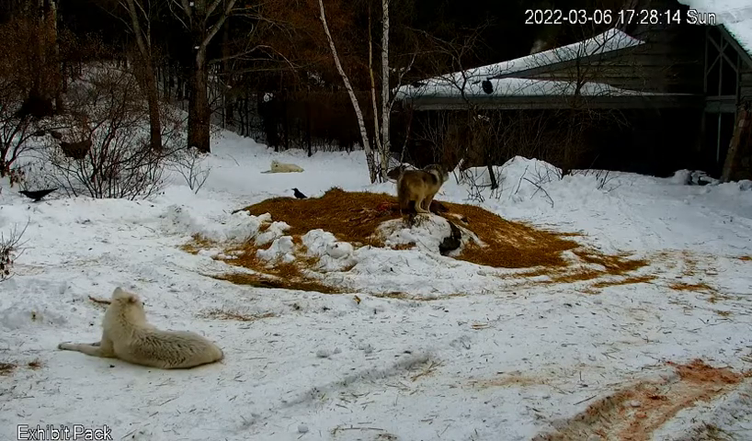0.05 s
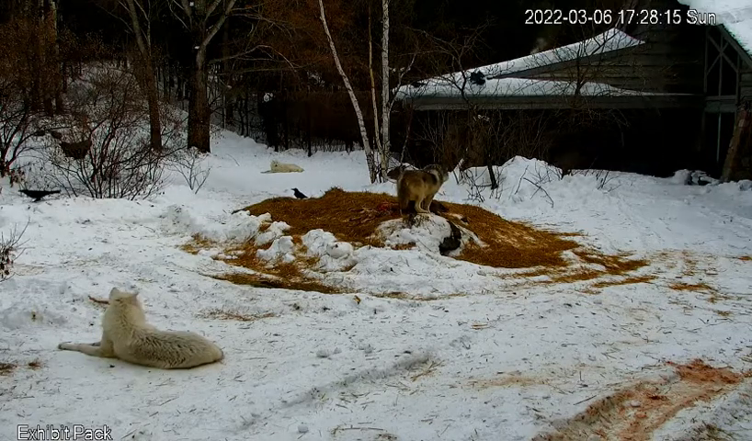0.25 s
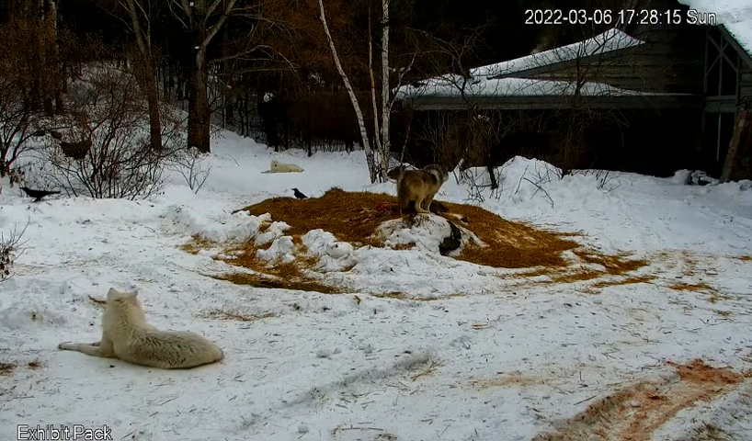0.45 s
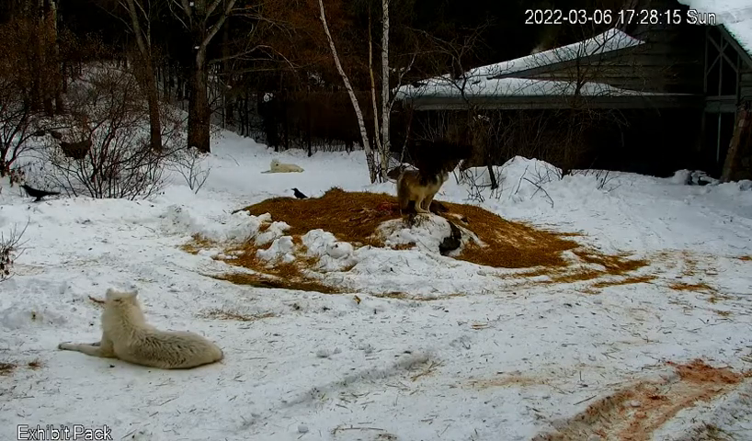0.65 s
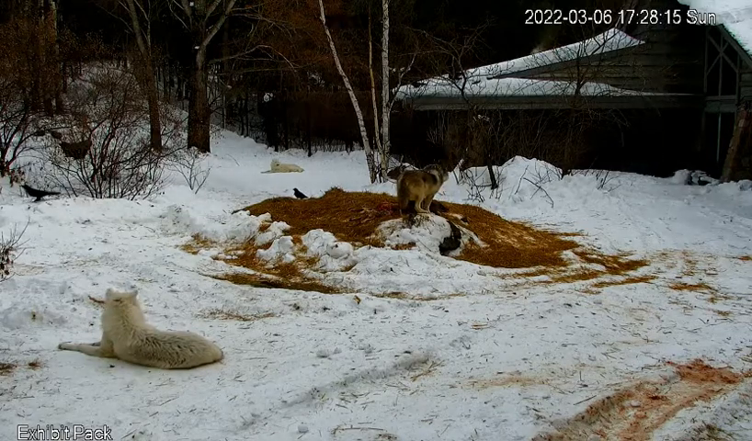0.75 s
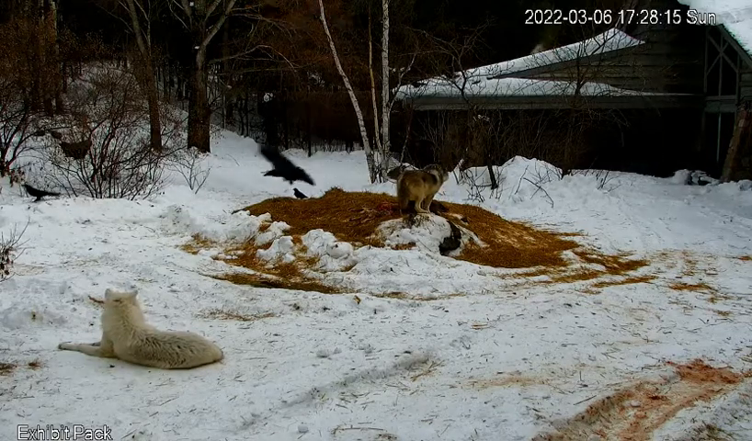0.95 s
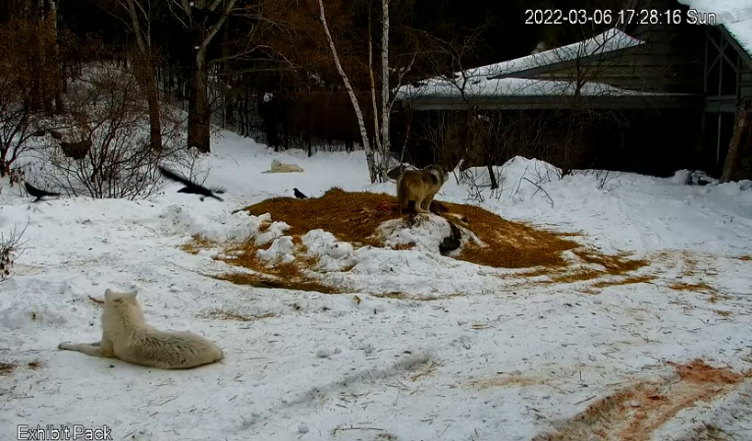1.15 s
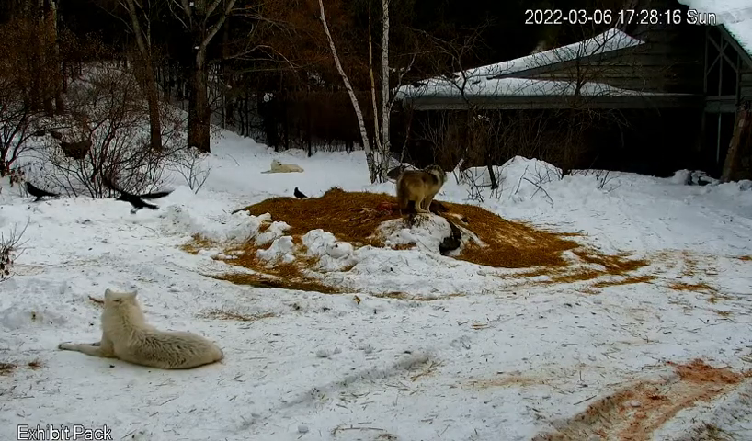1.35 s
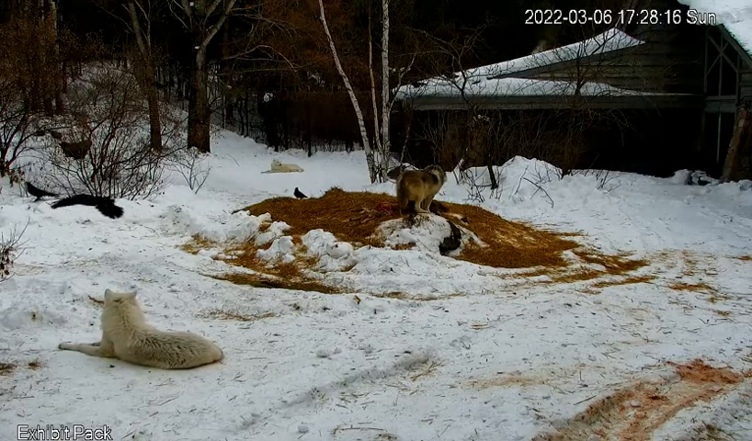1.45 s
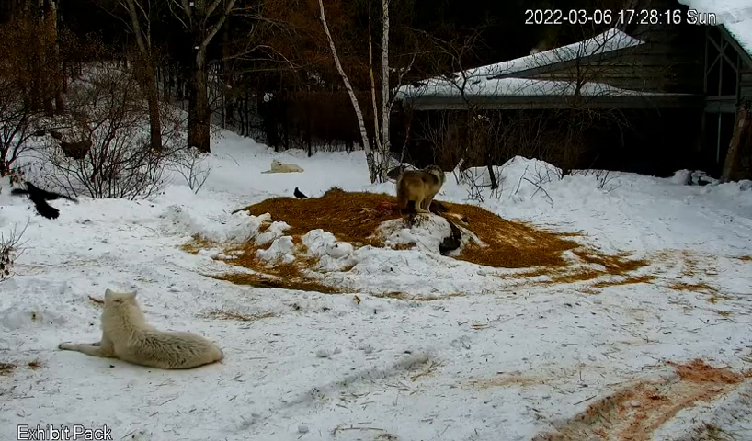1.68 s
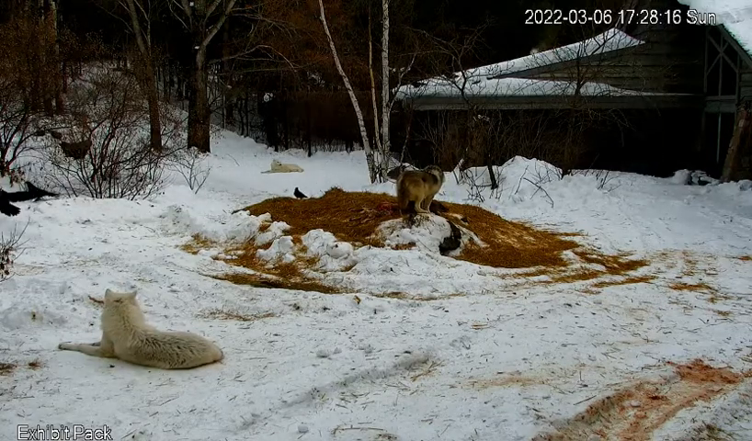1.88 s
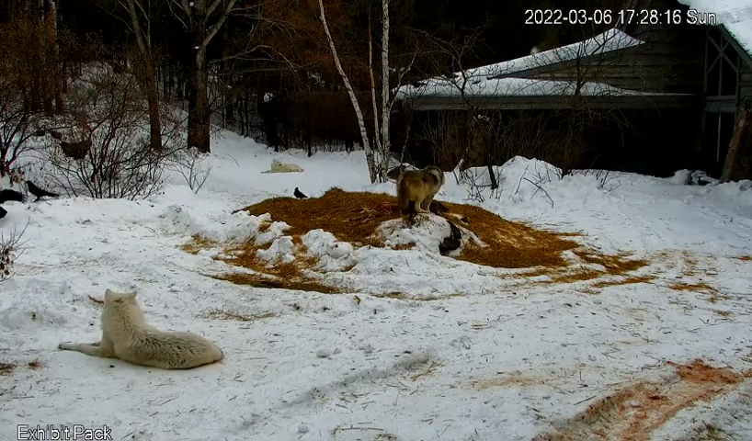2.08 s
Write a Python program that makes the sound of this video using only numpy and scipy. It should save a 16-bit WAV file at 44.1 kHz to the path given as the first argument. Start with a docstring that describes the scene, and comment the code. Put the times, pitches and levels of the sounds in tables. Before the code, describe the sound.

A raven calls twice in the first second, short, arched and raspy, each with a quick echo off trees and a shed; then soft hollow wing flaps and faint low thuds over quiet outdoor hiss.

```python
"""Raven calls in a snowy yard

Two ravens, probably, call once each: clear arched notes of eight harmonics with a breathy rasp. Trees and a
shed wall answer with smeared echoes and decaying noise tails. Soft hollow flaps, probably wings, are air noise
in two resonances; low thuds and two higher ticks are short sine bumps. Beneath lie a faint outdoor murmur and
a wavering hum, with a faint hiss above."""
import sys
import numpy as np
from scipy import signal
from scipy.fft import rfft, irfft, next_fast_len
from scipy.io import wavfile
from scipy.ndimage import uniform_filter1d, map_coordinates

SR = 44100
rng = np.random.default_rng(int(sys.argv[2]) if len(sys.argv) > 2 else 0)


def unload_wav(signal):
    """Save mono or channel-first audio to the path in sys.argv[1] as 16-bit WAV at rate SR, clipped to [-1, 1]."""
    wavfile.write(
        sys.argv[1],
        SR,
        np.round(np.clip(np.atleast_2d(signal).T, -1, 1) * 32767).astype(np.int16),
    )


N = 92610
T = np.arange(N) / SR  # time in seconds

# Outdoor murmur spectrum. Each row: frequency in Hz, relative density in dB.
MURMUR_SPECTRUM = [(15, -42), (25, -10.5), (76, -10.5), (145, -0.5), (210, -7), (243, -1.5), (318, -8),
                   (471, 2), (512, -3.5), (876, -1), (3500, -26.5), (4550, -74.5), (7700, -120)]
MURMUR_DB, MURMUR_LUMPS_DB = -55, 1.3
HUM_HZ, HUM_DB = 116.7, -69.5  # the hum level is that of the sine's peak
# Hiss spectrum. Each row: frequency in Hz, relative density in dB.
HISS_SPECTRUM = [(1760, -38), (3000, -8), (4040, -1.5), (6570, -2.5), (7190, -2), (15800, -4.5)]
# Level course of the hiss. Each row: time in seconds, level in dB before the common lift.
HISS_COURSE = [(0.0, -73.5), (0.22, -71.5), (0.43, -65), (0.44, -71.5), (0.79, -72), (1.06, -69),
               (1.09, -72), (1.74, -70), (2.1, -69.5)]
HISS_LIFT_DB = 3.44

# Course of each call. Each row: time in seconds, pitch in Hz, level of the second partial in dB,
# level in dB of the rasp's noise before the pitch pulses it.
CALL_1 = [(.208, 580, -71.5, -66.5), (.222, 697.6, -34, -54), (.232, 755.6, -24.5, -40),
          (.248, 795.2, -24, -43), (.276, 849.6, -19.5, -44.5), (.31, 859.1, -20, -42),
          (.342, 840.8, -19, -41), (.36, 814.8, -21, -42.5), (.38, 739, -30.5, -41),
          (.398, 615, -43.5, -56.5)]
CALL_2 = [(.848, 610.6, -67, -68), (.862, 694, -28, -51.5), (.878, 750.6, -23.5, -36),
          (.9, 774.5, -23.5, -45.5), (.94, 770.2, -25, -44), (.955, 745.6, -24, -43),
          (.968, 738.4, -22.5, -41.5), (.985, 656.4, -39, -46), (1.004, 537, -39, -69)]
# Throat colour of each call, taken relative to the second partial. Each row: frequency in Hz, gain in dB.
THROAT_1 = [(550, -8), (800, -15), (1250, 5), (1650, 5), (2100, -12), (2550, -15), (3300, -16.5),
            (4250, -29), (4700, -44.5), (5200, -46.5), (6000, -58.5), (7000, -63)]
THROAT_2 = [(550, -11.5), (760, -11), (1250, 0), (1550, 1.5), (2250, -21.5), (2800, -14.5), (3100, -19),
            (3800, -35), (4250, -33), (4650, -59), (5400, -75), (6200, -71)]
# Rasp spectrum. Each row: frequency in Hz, relative density in dB.
RASP_SPECTRUM = [(300, -36), (700, -10), (1500, 16.5), (2500, -0.5), (4000, -11), (5500, -36.5),
                 (7000, -34.5), (9000, -46)]
CALL_FADE_S = .006
PITCH_JITTER, JITTER_RATE = .0015, 300  # fraction of the pitch; knots per second
STEADY_DB = .5  # waver of the second partial
WAVER_DB, WAVER_RATE = 2.5, 120  # extra dB per root of the distance from the second; knots per second
# Below full voice each partial above the second loses this share of the drop again.
DULLING, FULL_VOICE_DB = .12, -22.5

# Walls and trunks heard from each calling place. Each row: delay in seconds, level in dB, treble lift in dB.
ECHOES_1 = [(0.029, -19.5, 1), (0.057, -11, 8), (.078, -9.5, 17.5), (.098, -13, 14.5), (.125, -18, 1.5),
            (0.149, -23, 5), (.165, -26, 3.5), (0.177, -21, -3), (.192, -26.5, -5), (.25, -42.5, 5),
            (0.369, -42.5, 4)]
ECHOES_2 = [(0.032, -13, 0.96), (0.059, -13, 1.5), (0.079, -11, 1.53), (0.099, -14.5, 1.4),
            (.118, -20.5, 1.5), (.15, -22, 1.3), (.178, -26, 1.5), (.19, -21.5, 1.5), (.205, -44, 1.47),
            (.25, -48, 1.5), (0.369, -40.5, 1.5)]
# Colour of the yard's answer to each call. Each row: frequency in Hz, gain in dB.
ANSWER_1 = [(500, -4), (850, 1.5), (1600, -3.5), (3000, -6.5), (4300, 0.5), (5200, 2.5), (7000, -5)]
ANSWER_2 = [(500, -9), (800, -9.5), (1600, -1.5), (3000, -7.5), (3900, 1), (5200, -14.5), (7000, -10)]
# Decay of the trees' answer. Each row: frequency in Hz, time to fall 60 dB in seconds.
TREES_DECAY = [(500, 0.27), (1600, 0.34), (3500, .28), (6000, 0.15)]
TREES_DB, TREES_RISE_S = -10, .015
FAR_DB, FAR_T60_S = -30, 1.7
SMEAR_S = .012
TREBLE_HZ = 4600  # the treble lift acts above this
BASS_HZ, BASS_LOSS_DB_PER_S = 1100, 69  # far trunks return little bass

# Flaps. Each row: centre in seconds, level of the lower resonance in dB, length in seconds,
# level of the upper resonance relative to the lower in dB.
FLAPS = [(0.437, -44.5, 0.012, 2.5), (1.062, -43.5, 0.052, -1.5), (1.25, -51, .03, -2),
         (1.472, -54.5, 0.081, -4), (1.648, -53, 0.039, -6), (1.695, -60.5, 0.021, 10),
         (1.91, -48, 0.018, -6), (1.931, -47.5, 0.016, -2.5), (1.956, -44.5, 0.038, 0),
         (1.988, -43, 0.013, -9), (2.012, -51.5, 0.039, -2), (2.043, -60, 0.033, 5.5)]
# Hollow resonances, lower then upper. Each row: centre in Hz, width in Hz of one of two cascaded stages.
HOLLOWS = [(445, 112), (770, 110)]
# Broad air noise of a flap. Each row: frequency in Hz, relative density in dB.
SWISH_SPECTRUM = [(150, -6.5), (400, -5), (1800, -0.5), (5000, -30), (12000, -27), (16000, -28)]
SWISH_DB = -9  # relative to the lower resonance

# Low thuds. Each row: centre in seconds, level in dB, pitch in Hz.
THUDS = [(.455, -51, 130), (1.005, -51, 110), (1.318, -43.5, 190), (1.39, -46, 213), (1.428, -45.5, 164),
         (1.53, -56.5, 150), (1.57, -52, 140), (1.65, -50.5, 142), (1.75, -67, 159), (1.885, -53, 148),
         (2.095, -48, 248)]
# Higher ticks. Each row: centre in seconds, level in dB, pitch in Hz.
TICKS = [(1.817, -46.5, 1080), (2.075, -50, 1320)]
THUD_CYCLES, TICK_CYCLES = .54, 3.1  # cycles from the centre to 1/e of the peak

TOP_HZ = 15750


def amp(db):
    """Decibel law: 20 dB is a tenfold amplitude."""
    return 10 ** (np.asarray(db) / 20)


def unit(x):
    """Normalization to a root mean square of 1."""
    return x / np.sqrt(np.mean(x ** 2) + 1e-20)


def along(points, hz):
    """Linear interpolation of tabled values on a logarithmic frequency axis."""
    f, v = np.transpose(points)
    return np.interp(np.log(hz + 1), np.log(f + 1), v)


def wobble(rate):
    """Smooth random modulation: a spline through Gaussian knots, rate knots per second."""
    knots = rng.standard_normal(int(N * rate / SR) + 4)
    return map_coordinates(knots, [T * rate])


def filtered(x, response):
    """Linear filtering: the spectrum is multiplied by a response of frequency."""
    m = next_fast_len(N + SR // 2)
    spectrum = rfft(x, m) * response(np.fft.rfftfreq(m, 1 / SR))
    return irfft(spectrum, m)[..., :N]


def rush(spectrum, patchy_db):
    """Coloured noise: random gain over patches of time and frequency, then a fixed spectrum, at rms 1."""
    z = signal.stft(rng.standard_normal(N), nperseg=1024)[2]
    across_frequency = uniform_filter1d(rng.standard_normal(z.shape), 5, 0)
    patches = unit(uniform_filter1d(across_frequency, 3, 1))
    x = signal.istft(z * amp(patchy_db * patches), nperseg=1024)[1][:N]
    return unit(filtered(x, lambda hz: amp(along(spectrum, hz))))


def murmur():
    """Broadband ambience: coloured noise with a lumpy random envelope."""
    level_db = MURMUR_DB + MURMUR_LUMPS_DB * wobble(39.95)
    return amp(level_db) * rush(MURMUR_SPECTRUM, patchy_db=1.4)


def hum():
    """Amplitude and phase modulation: a sine wavering in level and phase."""
    level_db = HUM_DB + 2.5 * wobble(17)
    return amp(level_db) * np.sin(2 * np.pi * HUM_HZ * T + 2.4 * wobble(9))


def hiss():
    """Modulated noise: a treble rush follows a level course with small random level changes."""
    course_db = np.interp(T, *np.transpose(HISS_COURSE))
    level_db = course_db + HISS_LIFT_DB + 1.2 * wobble(50)
    return amp(level_db) * rush(HISS_SPECTRUM, patchy_db=4.6)


def call(rows, throat):
    """Source and filter: harmonics of an arched pitch take the throat's colour; pitch-pulsed noise is the rasp."""
    s, *columns = np.transpose(rows)
    hz, db, rasp_db = [np.interp(T, s, c) for c in columns]
    jittered_hz = hz * (1 + PITCH_JITTER * wobble(JITTER_RATE))
    phase = 2 * np.pi * np.cumsum(jittered_hz) / SR
    gate = np.clip(np.minimum(T - s[0], s[-1] - T) / CALL_FADE_S, 0, 1)
    drop_db = DULLING * np.minimum(db - FULL_VOICE_DB, 0)
    voice = 0
    for k in range(1, 9):
        colour_db = along(throat, k * hz) - along(throat, 2 * hz)
        dull_db = max(k - 2, 0) * drop_db
        waver_db = (STEADY_DB + WAVER_DB * np.sqrt(abs(k - 2))) * wobble(WAVER_RATE)
        voice = voice + amp(colour_db + dull_db + waver_db) * np.sin(k * phase)
    pulses = amp(2.6 * wobble(90)) * (1 + np.cos(phase))
    rasp = pulses * rush(RASP_SPECTRUM, patchy_db=2.5)
    return gate * (np.sqrt(2) * amp(db) * voice + amp(rasp_db) * rasp)


def dense_answer(x):
    """Diffuse reverberation: convolution with decaying noise, dense from the trees, long and faint from afar."""
    hz, t, z = signal.stft(rng.standard_normal(SR), SR, nperseg=256)
    decay_db = -60 * t / along(TREES_DECAY, hz)[:, None]
    trees = signal.istft(z * amp(decay_db), SR, nperseg=256)[1][:SR]
    trees = trees * (1 - np.exp(-T[:SR] / TREES_RISE_S))
    far = rng.standard_normal(SR) * amp(-60 * T[:SR] / FAR_T60_S)
    tail = amp(TREES_DB) * trees / np.linalg.norm(trees) + amp(FAR_DB) * far / np.linalg.norm(far)
    return signal.fftconvolve(x, tail)[:N]


def single_echoes(x, echoes):
    """Discrete reflection: delayed, smeared copies, brighter from hard walls."""
    treble = filtered(x, lambda f: 1 / (1 + (TREBLE_HZ / (f + 1)) ** 10))
    bass = filtered(x, lambda f: 1 / (1 + (f / BASS_HZ) ** 10))
    smear_n = round(SMEAR_S * SR)
    total = 0
    for delay, db, lift_db in echoes:
        smear = rng.standard_normal(smear_n) * np.hanning(smear_n)
        bass_gain = amp(-BASS_LOSS_DB_PER_S * delay)
        heard = x + (amp(lift_db) - 1) * treble + (bass_gain - 1) * bass
        smeared = signal.fftconvolve(heard, smear / np.linalg.norm(smear))[:N]
        # Half the smear is taken off so that its middle falls on the delay.
        total = total + amp(db) * np.roll(smeared, round((delay - SMEAR_S / 2) * SR))
    return total


def yard(x, echoes, colour):
    """Superposition: the direct sound plus coloured single echoes and dense reverberation."""
    answer = dense_answer(x) + single_echoes(x, echoes)
    return x + filtered(answer, lambda f: amp(along(colour, f)))


def hollow_noise(centre, width):
    """Resonance: noise through two equal second-order band-pass stages, at rms 1."""
    def response(f):
        return (f * width / (centre * centre - f * f + 1j * f * width)) ** 2
    return unit(filtered(rng.standard_normal(N), response))


def flaps():
    """Resonant air puffs: Gaussian bursts of two hollow noises and a broad swish."""
    low, high = [hollow_noise(centre, width) for centre, width in HOLLOWS]
    swish = amp(SWISH_DB) * rush(SWISH_SPECTRUM, patchy_db=2.5)
    total = 0
    for s, db, length, upper_db in FLAPS:
        puff = np.exp(-2 * ((T - s) * 2 / length) ** 2)
        total = total + amp(db) * puff * (low + amp(upper_db) * high + swish)
    return total


def bumps(rows, cycles):
    """Short wave packets: sines under Gaussian envelopes, used for the thuds and the ticks."""
    total = 0
    for s, db, hz in rows:
        envelope = np.exp(-((T - s) * hz / cycles) ** 2)
        total = total + amp(db) * np.sqrt(2) * envelope * np.sin(2 * np.pi * hz * (T - s))
    return total


def scene():
    """Superposition of the background, two answered calls, flaps, thuds and ticks."""
    background = murmur() + hum() + hiss()
    first_call = yard(call(CALL_1, THROAT_1), ECHOES_1, ANSWER_1)
    second_call = yard(call(CALL_2, THROAT_2), ECHOES_2, ANSWER_2)
    small_sounds = flaps() + bumps(THUDS, THUD_CYCLES) + bumps(TICKS, TICK_CYCLES)
    return (background + first_call + second_call + small_sounds)[None]


def record(dry):
    """Band limiting: nothing at or above the top frequency passes."""
    return filtered(dry, lambda hz: hz < TOP_HZ)


dry = scene()
out = record(dry)
unload_wav(out)
```